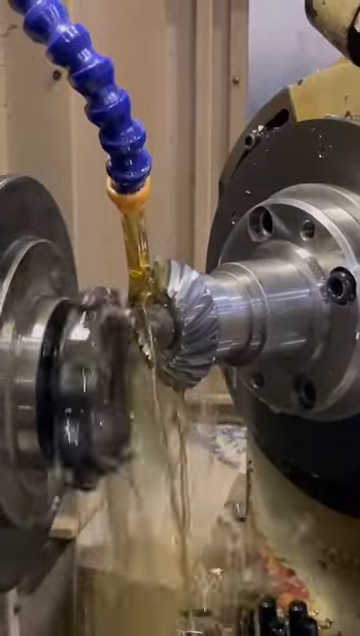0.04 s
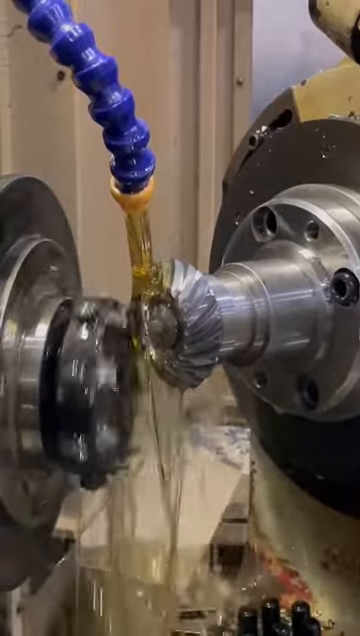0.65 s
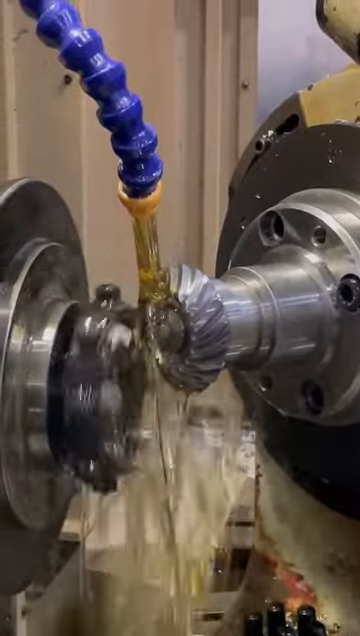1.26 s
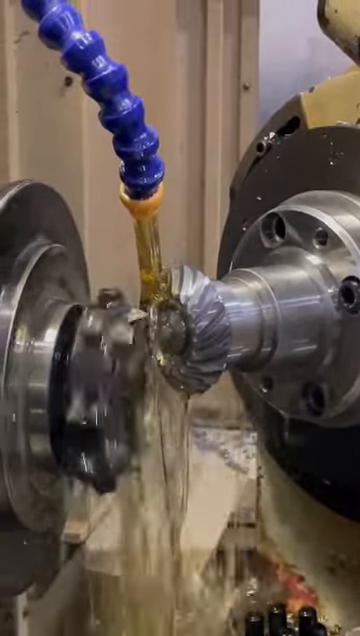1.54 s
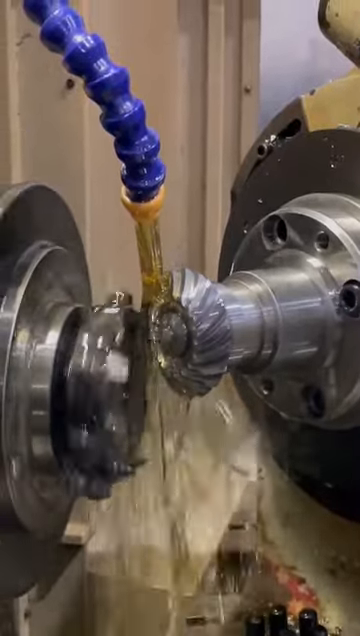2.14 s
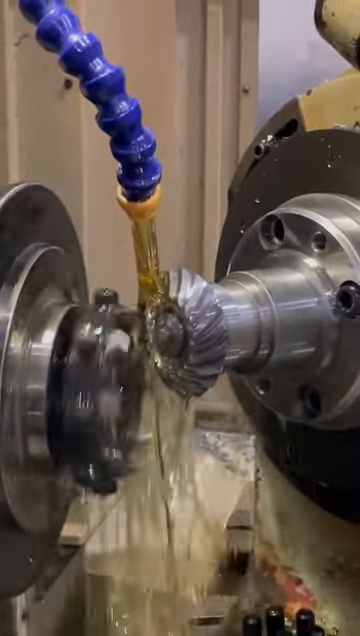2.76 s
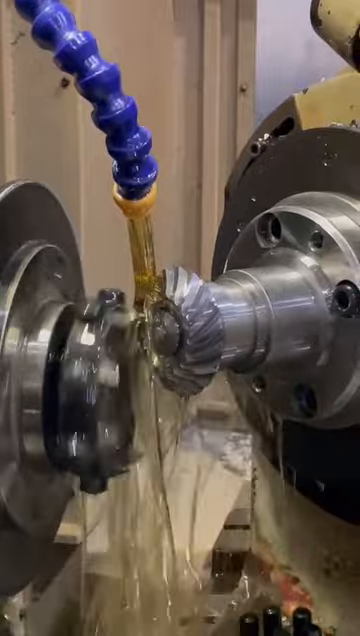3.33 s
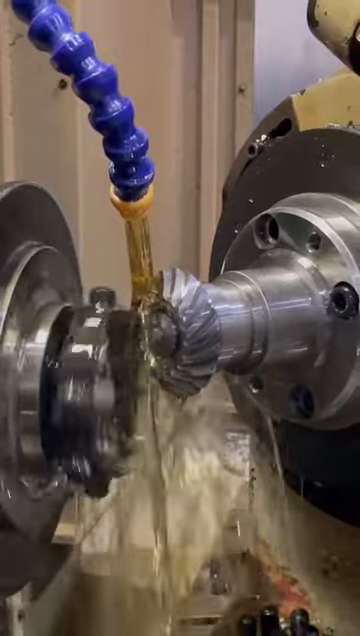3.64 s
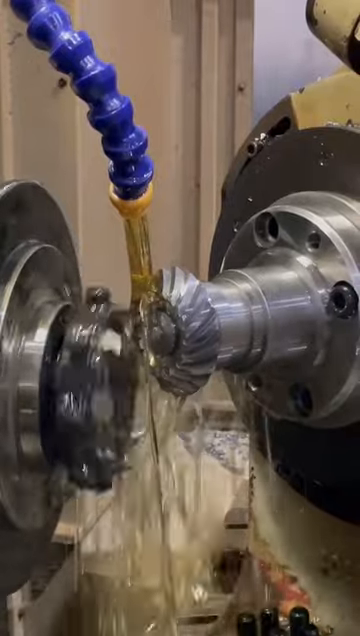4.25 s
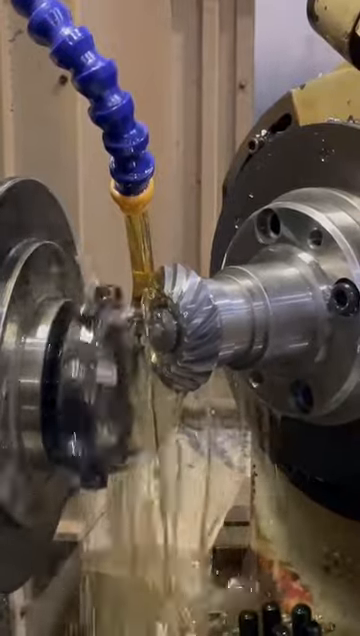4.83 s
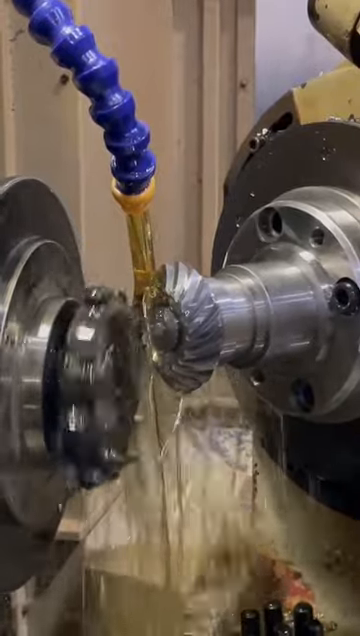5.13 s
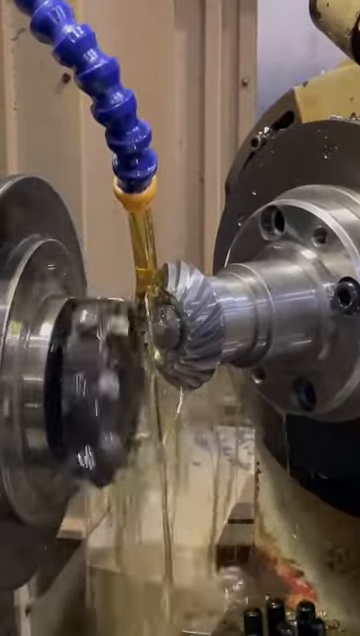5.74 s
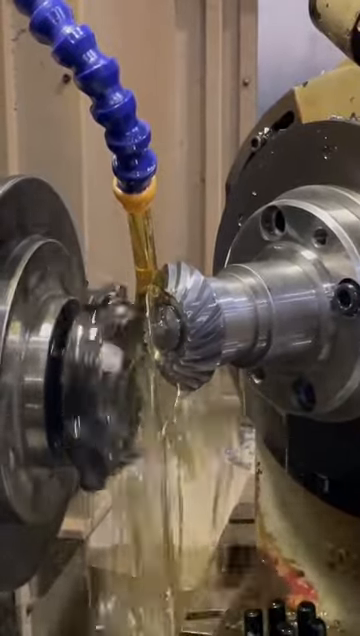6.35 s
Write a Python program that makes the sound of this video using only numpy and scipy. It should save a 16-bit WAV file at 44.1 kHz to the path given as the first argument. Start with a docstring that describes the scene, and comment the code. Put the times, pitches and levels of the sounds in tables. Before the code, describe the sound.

Cutting oil splashes and drips over the low, throbbing rumble of a running gear cutter, whose blades finally sizzle and squeak on steel.

```python
"""A gear cutting machine at close range

Two motors beat slowly against each other while gears whine over the resonant rumble of the housing.
Cutting oil patters on the spinning cutter, which flings off splats and drops that plink as they trap
bubbles in the pan. The spindle groans twice; near the end, friction makes the cut sizzle and squeal."""
import sys
import numpy as np
from scipy import signal
from scipy.fft import rfft, irfft, next_fast_len
from scipy.io import wavfile
from scipy.ndimage import uniform_filter1d

SR = 44100
rng = np.random.default_rng(int(sys.argv[2]) if len(sys.argv) > 2 else 0)


def waveform_to_disk(signal):
    """Save audio, clipped to [-1, 1], as 16-bit WAV at the path in sys.argv[1]."""
    frames = np.transpose(np.atleast_2d(signal))
    scaled = np.clip(frames, -1, 1) * 32767
    samples = np.round(scaled).astype(np.int16)
    wavfile.write(sys.argv[1], SR, samples)


N = 290619
TIME = np.arange(N) / SR
FREQS = np.fft.rfftfreq(N, 1 / SR)

# spectrum of the housing's rumble: (frequency [Hz], relative density [dB])
RUMBLE_SPECTRUM = [(11, -41), (18, -20), (33, -13), (46, 0.5), (70, -3.5), (92, -1), (119, -6), (220, -2),
                   (353, -3), (390, -3.5), (484, -4.5), (555, -9.5), (625, -7), (704, -14), (1060, -12),
                   (1780, -19.5), (2000, -18.5), (2600, -29), (4400, -120)]
# resonances of the housing's panels: (frequency [Hz], bandwidth [Hz], lift [dB])
PANEL_MODES = [(91.5, 8.9, 0.5), (147.4, 13, 4.5), (452, 13, 2.5), (674, 15, 6.5), (759, 32, 4.5),
               (856, 65, 3.5), (1047, 29, 4.5), (1386, 150, 1.5), (1495, 27, 3.5), (2120, 56, 1)]
# slow swells and dips of the bass rumble: (time [s], gain [dB])
BASS_SWELL = [(0, -1), (1.3, 2.5), (1.9, 2), (2.48, -1.5), (2.7, -6), (2.95, 1.5), (3.65, 1), (3.85, -2.5),
              (4.7, 1), (5.15, -2), (5.52, 2.5), (5.9, -1.5), (6.32, 0.5), (6.44, -13), (6.59, 3)]
# steady tones of the pump and gears: (frequency [Hz], relative level [dB])
DRIVE_TONES = [(95.6, -45), (213.0, -45.5), (302.7, -42), (353.3, -40), (481.8, -45.5), (513.0, -48.5),
               (605.6, -46), (824.9, -57), (908.3, -52.5), (1513.9, -51), (2674.4, -65), (2761.6, -56.5),
               (3785.5, -62), (3896.7, -55.5), (4180.1, -58)]
# spectrum of the oil stream: (frequency [Hz], relative density [dB])
OIL_SPECTRUM = [(900, -6), (1800, 1.5), (2600, 3.5), (3250, 2.5), (4300, 2.5), (5600, 1.5), (6800, -5),
                (9000, -9.5), (11000, -9), (13500, -21)]
# strength of the oil flow on the cutter: (time [s], relative strength [dB])
OIL_FLOW = [(0.0, -37), (0.18, -40.5), (1.39, -41), (3.25, -39.5), (4.31, -38.5), (4.77, -38.5),
            (5.25, -40.5), (5.8, -38), (6.15, -36), (6.3, -36), (6.59, -37)]
# loudest oil splats: (time [s], pitch [Hz], relative slap [dB], relative spray [dB], decay time [s])
LOUD_SPLATS = [(0.307, 5500, -50, -39, .006), (0.361, 5500, -27.5, -43, 0.0056),
               (0.398, 5000, -44, -44, .002), (0.503, 5000, -46, -43, .002), (0.739, 5000, -46, -41, .004),
               (0.756, 3470, -30.5, -42, 0.008), (0.962, 4550, -36, -53, .003),
               (1.141, 4400, -26.5, -27.5, 0.003), (1.328, 5900, -30.5, -40, 0.0048),
               (1.444, 4500, -45, -39, 0.0017), (1.4595, 4900, -23.5, -34, 0.0023),
               (1.479, 5000, -36, -39.5, 0.0044), (1.886, 5040, -30, -38, 0.0073),
               (2.015, 3240, -33, -42, 0.0065), (2.026, 5030, -31, -48, 0.0036),
               (2.112, 3270, -28.5, -39, 0.019), (2.187, 5200, -38, -40, 0.0017),
               (2.239, 4620, -28.5, -47, 0.0033), (2.268, 4800, -32, -43, 0.0024),
               (2.4685, 5000, -44, -39, 0.0026), (2.65, 5000, -44, -45, .002),
               (2.692, 5400, -45, -45, .003), (2.7085, 5400, -46, -39, 0.0054),
               (2.748, 5200, -35, -37, 0.0049), (2.9026, 5000, -44, -41, .002),
               (2.929, 3340, -28.5, -41, 0.018), (3.191, 3800, -31.5, -52, .0027),
               (3.2435, 4800, -33.5, -35, .003), (3.364, 5760, -27, -41, 0.003),
               (3.47, 3620, -30, -52, 0.0025), (3.479, 3450, -32, -54, 0.0036),
               (3.525, 3880, -32, -40, 0.0098), (3.542, 4800, -25, -54, 0.0045),
               (3.553, 4820, -30, -48, 0.0085), (3.566, 4500, -39, -43, .004),
               (3.637, 4700, -32.5, -36.5, 0.0068), (3.685, 5200, -30, -42, .0025),
               (3.69, 5330, -28, -32, .0045), (3.76, 4420, -28.5, -38, 0.0031),
               (3.892, 4250, -32, -42, .006), (3.929, 5000, -37, -43, 0.0034),
               (4.416, 5000, -40, -43, 0.0033), (4.461, 4500, -50, -36.5, 0.0027),
               (4.478, 5300, -37, -46, .002), (4.53, 5500, -43, -42, .005), (4.636, 4600, -36, -46, .004),
               (4.815, 4700, -54, -44, .002), (4.823, 4630, -28, -52, 0.004), (4.887, 5000, -44, -41, .002),
               (4.904, 5000, -42, -39, 0.0035), (5.009, 5640, -32, -40, 0.0021),
               (5.03, 6400, -35, -40, 0.0047), (5.1814, 4500, -43, -40.5, .002),
               (5.396, 5000, -43, -39, .004), (5.475, 5700, -38, -40, .005), (5.704, 5200, -41, -40, .005),
               (5.735, 5100, -29.5, -51.5, .005), (5.849, 5950, -28.5, -28, 0.0017),
               (6.274, 5400, -37, -44, .002), (6.289, 5000, -37, -40, .005),
               (6.364, 4130, -24.5, -39, 0.002), (6.463, 5300, -30.5, -43, 0.0056),
               (6.497, 5900, -28, -41, 0.0084)]
# drops that plink in the oil pan: (time [s], pitch [Hz], peak level [dB], rise time [s])
PAN_DROPS = [(0.518, 2400, -24, .0014), (0.524, 1150, -28, .007), (0.5553, 4760, -21, .0005),
             (0.6194, 3460, -20, .0007), (0.768, 1190, -24, .005), (0.778, 1130, -23, .007),
             (0.908, 608, -23, .008), (1.102, 3000, -22, .0007), (1.3312, 4590, -15.5, .0003),
             (1.4391, 5500, -21, .0005), (1.6826, 4710, -23, .0006), (1.886, 646, -24.5, .009),
             (2.0722, 5450, -24, .0005), (2.0961, 5490, -21, .0005), (2.1168, 2750, -22, .0008),
             (2.2662, 3900, -24, .0006), (2.3471, 5100, -19, .0006), (2.7227, 2250, -15, .0007),
             (3.1893, 2990, -19, .0009), (3.2407, 3450, -20, .0005), (3.5445, 3080, -17, .0014),
             (3.7329, 3500, -17, .0003), (4.0682, 4790, -21.5, .0005), (4.223, 4370, -17.5, .0005),
             (5.0094, 5400, -18, .0003), (5.183, 2850, -17.5, .0009), (5.6311, 5550, -19.5, .0006),
             (6.3622, 2560, -13, .0009), (6.3635, 2170, -18, .0014)]
# low groans of the spindle: (time [s], hold [s], pitch [Hz], level [dB], decay rate [dB/s])
SPINDLE_GROANS = [(3.4, 0.34, 160, -31.5, 42), (4.32, 0.2, 252, -26, 33)]
# how hard the blades bite: (time [s], level [dB])
BLADE_BITE = [(0, -84), (5.2, -48), (5.5, -39.5), (5.8, -35.5), (6.0, -37.5), (6.17, -31), (6.23, -39),
              (6.44, -54), (6.59, -48)]
# modes of the cutter and gear blank: (frequency [Hz], bandwidth per stage [Hz], relative level [dB])
STEEL_MODES = [(1350, 200, 4), (2210, 200, 1.5), (2430, 220, -1), (2700, 70, -0.5), (3590, 110, -3),
               (4190, 230, 1), (4490, 220, 1.5), (4740, 260, -8), (5520, 330, -9), (9250, 780, -11.5),
               (10800, 420, -12)]
# spectrum of the cut's sizzle: (frequency [Hz], relative density [dB])
SIZZLE_SPECTRUM = [(3400, -29), (5000, 1), (6300, 5.5), (8400, -5.5), (9800, 0.5), (11500, -1),
                   (13500, -13)]
# short squeals of rubbing steel: (time [s], duration [s], pitch [Hz], level [dB])
STEEL_SQUEALS = [(5.985, .1, 3605, -39), (6.07, .11, 4450, -40.5), (6.11, .07, 2680, -36.5),
                 (6.125, .07, 3560, -41), (6.275, .055, 2685, -37.5), (6.35, .04, 2650, -38),
                 (6.405, .055, 2660, -37.5)]
# response of the microphone, with the null of its port: (frequency [Hz], gain [dB])
MIC_RESPONSE = [(6300, -1.5), (7100, -6.5), (7450, -27), (7750, -38), (8050, -13), (8300, -5), (9000, 0.5)]


def gain_of(db):
    """Amplitude ratio of a level in decibels."""
    return 10 ** (np.asarray(db) / 20)


def unit_rms(x):
    """Normalisation to an rms of 1."""
    return x / np.sqrt(np.mean(x ** 2) + 1e-20)


def spectrum_db(table):
    """Interpolation of a spectrum over log frequency."""
    hz, db = np.transpose(table)
    return np.interp(np.log(FREQS + 1), np.log(hz + 1), db)


def envelope_db(table):
    """Linear interpolation of a level over time."""
    return np.interp(TIME, *np.transpose(table))


def coloured(x, db):
    """Zero-phase filtering by a gain in dB at each frequency."""
    return irfft(rfft(x) * gain_of(db), N)


def noise(db):
    """Spectrally shaped Gaussian noise of rms 1."""
    return unit_rms(coloured(rng.standard_normal(N), db))


def drift(rate_hz, step=64):
    """Random modulation of rms 1: noise low-passed at rate_hz."""
    size = next_fast_len(N // step + 2)
    hz = np.fft.rfftfreq(size, step / SR)
    slow = irfft(rfft(rng.standard_normal(size)) / np.sqrt(1 + (hz / rate_hz) ** 4), size)
    return unit_rms(np.interp(np.arange(N) / step, np.arange(size), slow))


def resonate(x, hz, width_hz):
    """Forced response of a two-pole resonator."""
    return signal.lfilter(*signal.iirpeak(hz, hz / width_hz, fs=SR), x)


def add(mix, start_s, sound):
    """Superposition of a sound on the mix."""
    part = mix[round(start_s * SR):][:len(sound)]
    part += sound[:len(part)]


def beat_phase(beat_hz=1.225, in_step_s=.535):
    """The phase lead of the faster motor grows at the difference frequency."""
    return 2 * np.pi * beat_hz * (TIME - in_step_s)


def motors(mean_hz=48.45, slow_db=-40.7, fast_db=-39.7):
    """Beating: two hums of nearly equal frequency reinforce and cancel in turn."""
    phase = 2 * np.pi * (mean_hz * TIME + rng.random())
    slow = gain_of(slow_db) * np.sin(phase - beat_phase() / 2)
    fast = gain_of(fast_db) * np.sin(phase + beat_phase() / 2)
    return np.sqrt(2) * (slow + fast)


def housing(level_db=-23, throb_db=0.6, surge_db=1.0, rattle_db=1.21, bass_hz=120, drone_hz=700):
    """Forced vibration: the bass throbs with the motors' beat, the drone surges, thin panels rattle."""
    lift_db = sum(db / (1 + (2 * (FREQS - hz) / width) ** 2) for hz, width, db in PANEL_MODES)
    shake = noise(spectrum_db(RUMBLE_SPECTRUM) + lift_db)
    bass = irfft(rfft(shake) / (1 + (FREQS / bass_hz) ** 6), N)
    drone = irfft(rfft(shake) / (1 + (FREQS / drone_hz) ** 6), N) - bass
    rattle = shake - bass - drone
    bass *= gain_of(0.2 + envelope_db(BASS_SWELL) + throb_db * np.cos(beat_phase()))
    drone *= gain_of(-0.74 + surge_db * drift(11))
    rattle *= gain_of(rattle_db * drift(15))
    return gain_of(level_db) * (bass + drone + rattle)


def drive(speed_wander=0.00027, wander_hz=0.21, flutter_db=2.0, gain_db=3.0):
    """Periodic forcing: shaft and gear-mesh tones follow one wavering speed."""
    speed = 1 + speed_wander * drift(3.9)
    out = np.zeros(N)
    for hz, db in DRIVE_TONES:
        cycles = np.cumsum(hz * speed + wander_hz * drift(6.5)) / SR + rng.random()
        out += gain_of(db + flutter_db * drift(5.3)) * np.sin(2 * np.pi * cycles)
    return gain_of(gain_db) * np.sqrt(2) * out


def oil_stream(wash_db=-39.5, patter_db=-37.5, flicker_db=3.0, per_s=1000, decay_cycles=9, bands=40):
    """Shot noise: countless small drops land at random and ring briefly over a smooth wash."""
    wash = noise(spectrum_db(OIL_SPECTRUM)) * gain_of(flicker_db * drift(10.4))
    t, patter = np.arange(SR // 50) / SR, np.zeros(N)
    for hz in np.geomspace(1900, 13000, bands):
        strength = gain_of(0.65 * np.minimum(rng.exponential(1, N), 3.6))
        impacts = strength * (rng.random(N) < per_s / bands / SR)
        ring = (1 - np.exp(-t * hz / 2)) * np.exp(-t * hz / decay_cycles) * np.sin(2 * np.pi * hz * t)
        spatter = resonate(np.exp(-t / 0.03) * rng.standard_normal(len(t)), hz, hz / 4)
        drop = (unit_rms(ring) + 0.45 * unit_rms(spatter)) * np.sqrt(hz)
        patter += signal.oaconvolve(impacts, drop)[:N]
    patter = unit_rms(coloured(patter, spectrum_db(OIL_SPECTRUM))) * gain_of(1.05 * drift(21))
    flow_db = envelope_db(OIL_FLOW)
    flow_gain = gain_of(0.48 * (flow_db - flow_db.mean()))
    return (gain_of(wash_db) * wash + gain_of(patter_db) * patter) * flow_gain


def bubbles(level_db=-47, per_s=45, spread_db=2.0, decay_cycles=14, glide_per_s=12, bands=30):
    """Damped oscillation: each small bubble bursting in the pan gives a slightly rising note."""
    t, out = np.arange(SR // 25) / SR, np.zeros(N)
    for hz in np.geomspace(900, 6000, bands):
        strength = gain_of(-spread_db * np.minimum(rng.exponential(1, N), 2.5))
        bursts = strength * (rng.random(N) < per_s / bands / SR)
        envelope = (1 - np.exp(-t * hz / 2)) * np.exp(-t * hz / decay_cycles)
        note = envelope * np.sin(2 * np.pi * hz * t * (1 + glide_per_s * t / 2))
        out += signal.oaconvolve(bursts, note)[:N]
    return gain_of(level_db) * unit_rms(out)


def small_splats(low_hz=2500, high_hz=6300, slap_db=-38, spray_db=-49, spread_db=4, count=24):
    """Random impacts: one lesser splat in each equal time slot, in rows like LOUD_SPLATS."""
    return [((slot + when) * N / SR / count,
             low_hz * (high_hz / low_hz) ** pitch,
             slap_db + spread_db * (2 * slap - 1),
             spray_db + spread_db * (2 * spray - 1),
             .003 * 2 ** (2 * decay - 1))
            for slot, (when, pitch, slap, spray, decay) in enumerate(rng.random((count, 5)))]


def splats(slap_gain_db=-8, spray_gain_db=-9, width_hz=600, rise_s=0.000077, trickle_s=.04, lump_db=3):
    """Impact noise: flung oil lands with a pitched slap and a fine spray, then trickles briefly."""
    t, out = np.arange(SR // 12) / SR, np.zeros(N)
    spray_band = signal.butter(4, [7600, 11500], "bandpass", fs=SR)
    slap_band = signal.butter(5, [2300, 6500], "bandpass", fs=SR)
    for start_s, hz, slap_db, spray_db, decay_s in LOUD_SPLATS + small_splats():
        burst, hiss, lumps = rng.standard_normal((3, len(t)))
        impact = np.exp(-(t / decay_s) ** 2 / 2)
        trickle = gain_of(-25) * np.exp(-t / trickle_s)
        envelope = (1 - np.exp(-t / rise_s)) ** 2 * (impact + trickle)
        envelope *= gain_of(lump_db * unit_rms(uniform_filter1d(lumps, 30)))
        pitched = unit_rms(resonate(resonate(envelope * burst, hz, width_hz), hz, 2 * width_hz))
        broad = unit_rms(signal.lfilter(*slap_band, envelope * hiss))
        slap = gain_of(slap_db + slap_gain_db) * unit_rms(pitched + gain_of(-0.5) * broad)
        spray = unit_rms(signal.lfilter(*spray_band, envelope * burst))
        add(out, start_s, slap + gain_of(spray_db + spray_gain_db) * spray)
    return out


def plinks():
    """Bubble resonance: air trapped by a drop swells into a note within a few cycles and decays."""
    t, out = np.arange(SR // 12) / SR, np.zeros(N)
    for start_s, hz, db, rise_s in PAN_DROPS:
        envelope = t / rise_s * np.exp(1 - t / rise_s)
        add(out, start_s, gain_of(db) * envelope * np.sin(2 * np.pi * hz * t))
    return out


def groans(width_hz=165, rise_s=0.046):
    """Broad resonance: a low mode of the spindle swells as the blades dig in, holds and dies away."""
    out = np.zeros(N)
    for start_s, hold_s, hz, db, db_per_s in SPINDLE_GROANS:
        shake = resonate(resonate(rng.standard_normal(N), hz, width_hz), hz, width_hz)
        attack = np.clip((TIME - start_s) / rise_s, 0, 1)
        fading_s = np.maximum(TIME - start_s - rise_s - hold_s, 0)
        out += attack * gain_of(db - db_per_s * fading_s) * unit_rms(shake)
    return out


def cut(chatter_db=1.0, mode_drift_db=2, sizzle_db=-5.5):
    """Frictional excitation: scraping blades sizzle and ring the steel, each mode coming and going."""
    scrape = rng.standard_normal(N) * gain_of(chatter_db * drift(60))
    ring = np.zeros(N)
    for hz, width, db in STEEL_MODES:
        mode = unit_rms(resonate(resonate(scrape, hz, width), hz, width))
        ring += gain_of(db + mode_drift_db * drift(9.5)) * mode
    sizzle = unit_rms(coloured(scrape, spectrum_db(SIZZLE_SPECTRUM)))
    return gain_of(envelope_db(BLADE_BITE)) * (unit_rms(ring) + gain_of(sizzle_db) * sizzle)


def squeals(wander_hz=5, flutter_db=2.0):
    """Stick-slip oscillation: friction sustains a single mode of the steel for a moment."""
    out = np.zeros(N)
    wander = wander_hz * drift(75)
    flutter = gain_of(flutter_db * drift(80))
    for start_s, length_s, hz, db in STEEL_SQUEALS:
        span = np.flatnonzero((TIME >= start_s) & (TIME < start_s + length_s))
        tone = np.sin(2 * np.pi * np.cumsum(hz + wander[span]) / SR) * flutter[span]
        out[span] += gain_of(db) * unit_rms(tone * signal.windows.tukey(len(span), .7))
    return out


def guards(x, t60_s=0.063, gap_s=.003, wet_db=-11):
    """Reverberation: reflections from the sheet-metal guards add a short, dense tail."""
    t = np.arange(SR // 2) / SR
    tail = rng.standard_normal(len(t)) * gain_of(-60 * t / t60_s) * (t > gap_s)
    return x + gain_of(wet_db) * signal.fftconvolve(x, tail / np.linalg.norm(tail))[:N]


def scene():
    """Superposition: the machine is heard directly, the oil and the cut inside its guards."""
    oil = oil_stream() + splats() + plinks() + bubbles()
    machine = housing() + motors() + groans() + drive()
    return (machine + guards(oil + cut() + squeals()))[None]


def record(dry):
    """Linear filtering: the microphone's response, then a low-pass band limit."""
    low_pass = signal.firwin(511, cutoff=13900, window=("kaiser", 9), fs=SR)
    return signal.oaconvolve(coloured(dry, spectrum_db(MIC_RESPONSE)), low_pass[None], "same")


dry = scene()
out = record(dry)
waveform_to_disk(out)
```